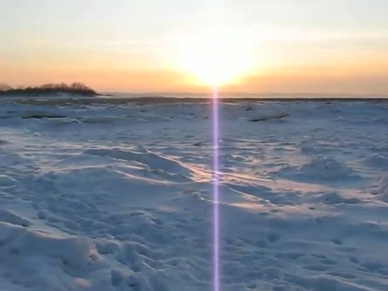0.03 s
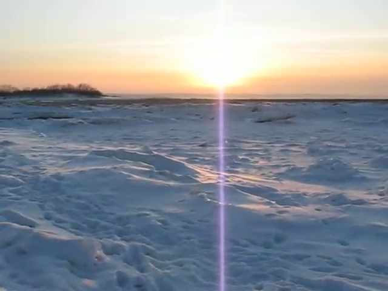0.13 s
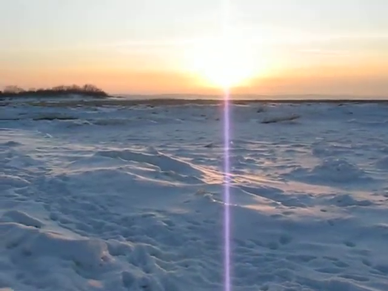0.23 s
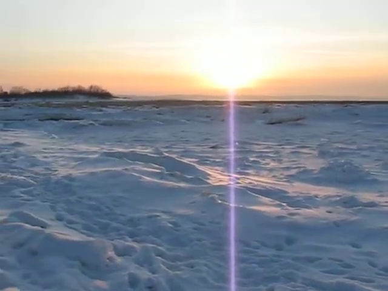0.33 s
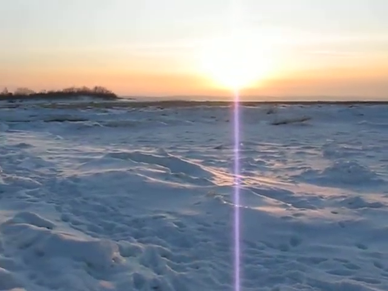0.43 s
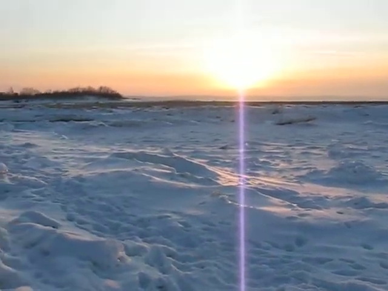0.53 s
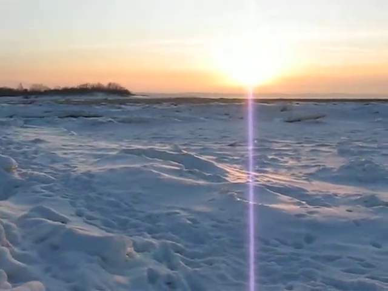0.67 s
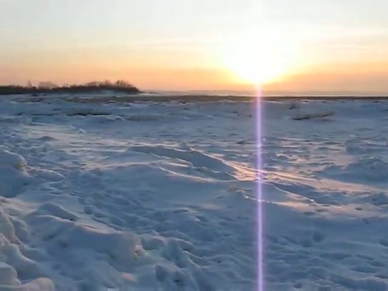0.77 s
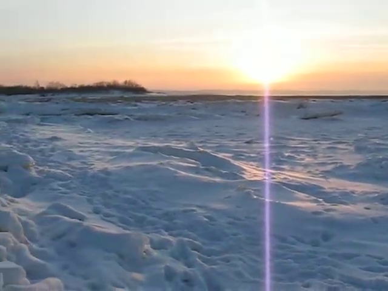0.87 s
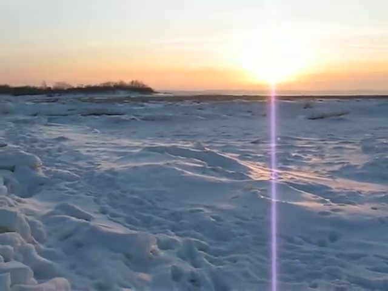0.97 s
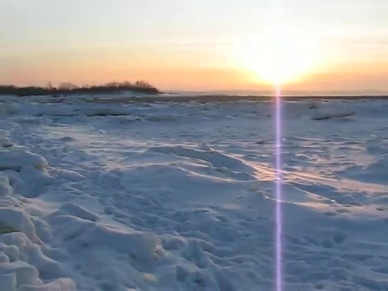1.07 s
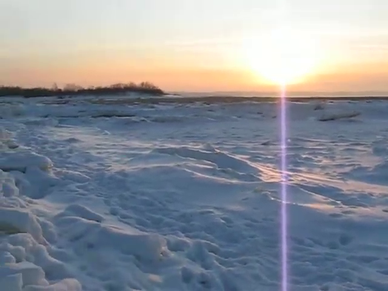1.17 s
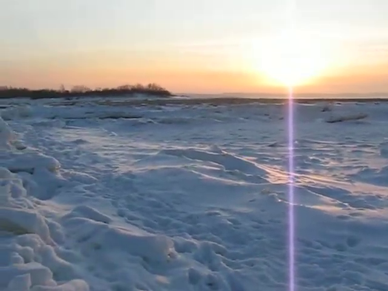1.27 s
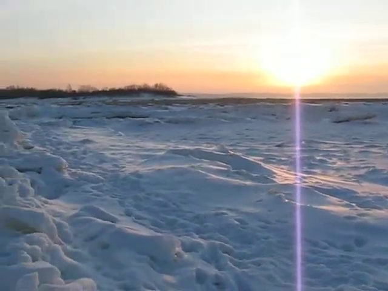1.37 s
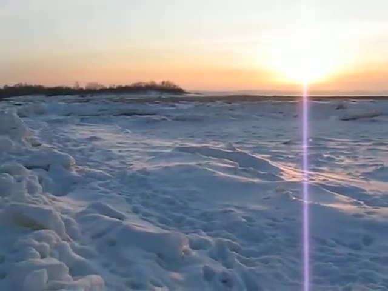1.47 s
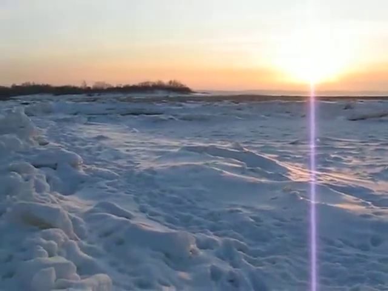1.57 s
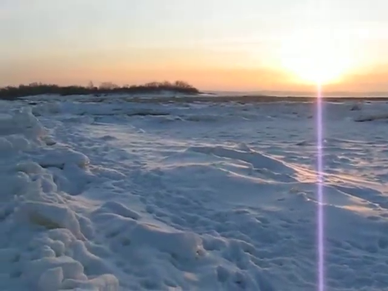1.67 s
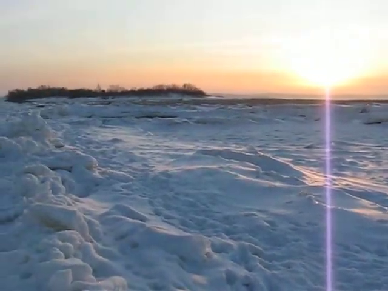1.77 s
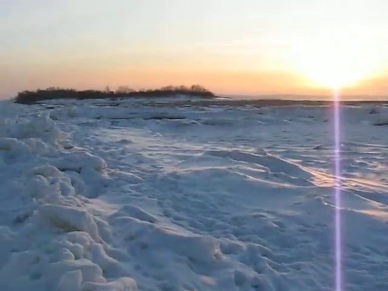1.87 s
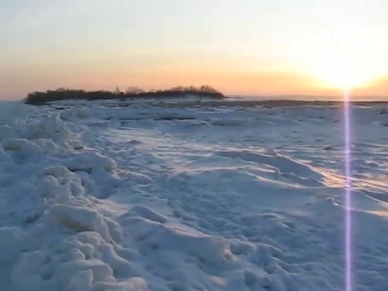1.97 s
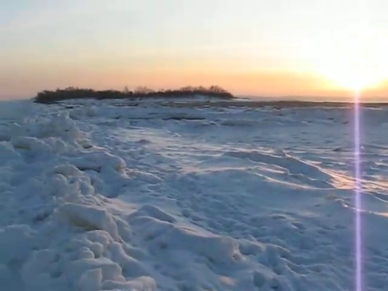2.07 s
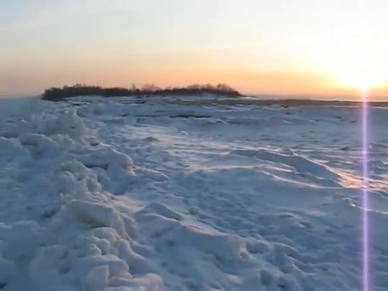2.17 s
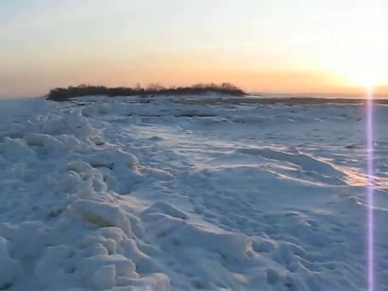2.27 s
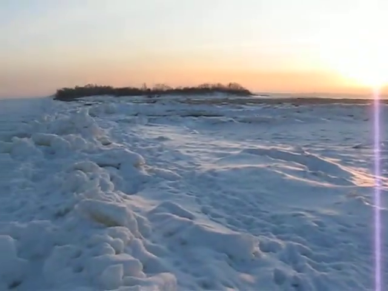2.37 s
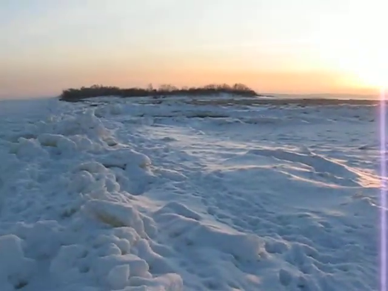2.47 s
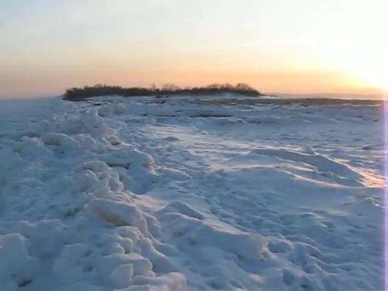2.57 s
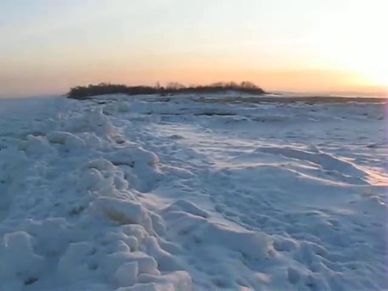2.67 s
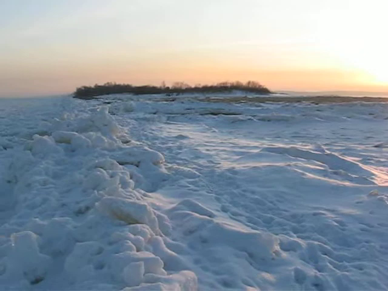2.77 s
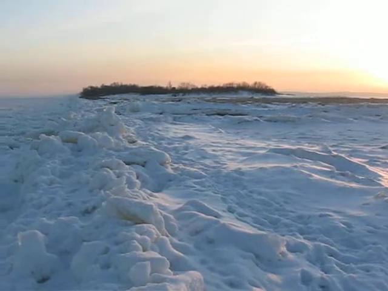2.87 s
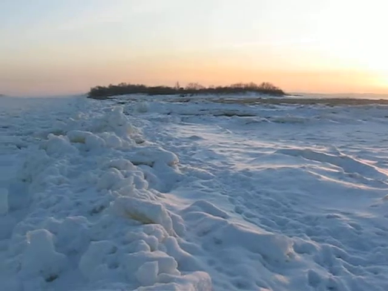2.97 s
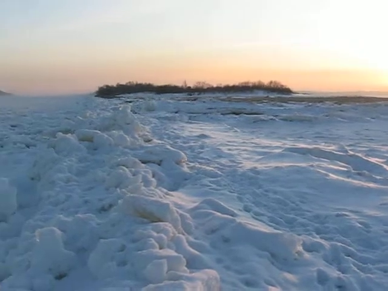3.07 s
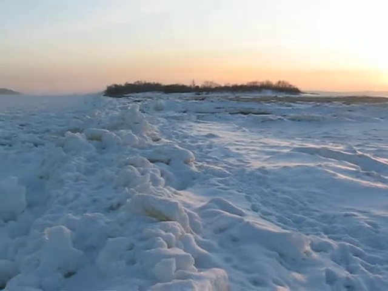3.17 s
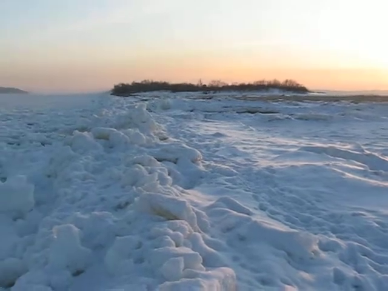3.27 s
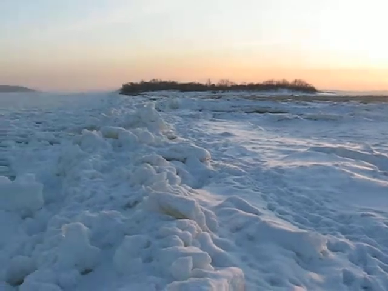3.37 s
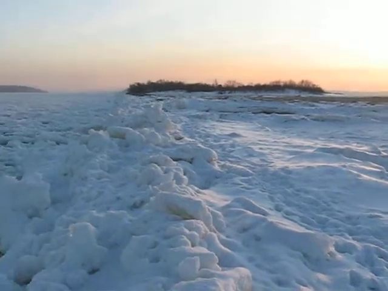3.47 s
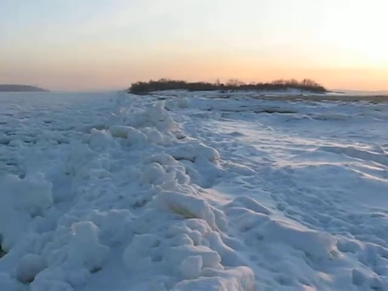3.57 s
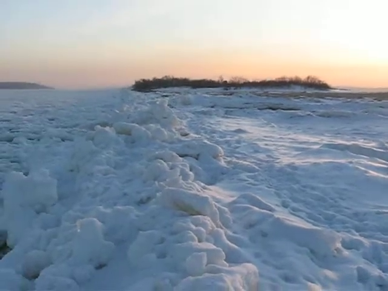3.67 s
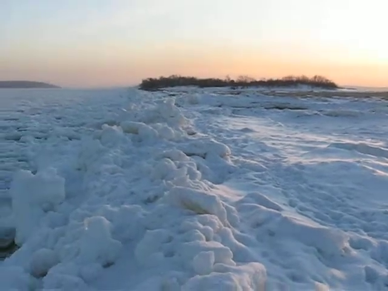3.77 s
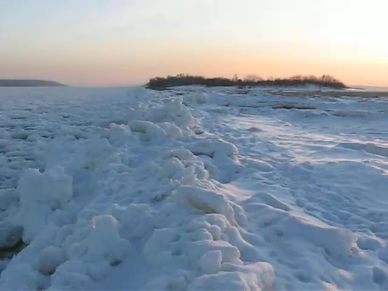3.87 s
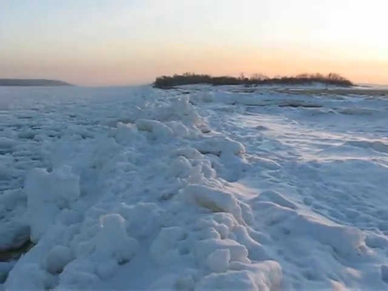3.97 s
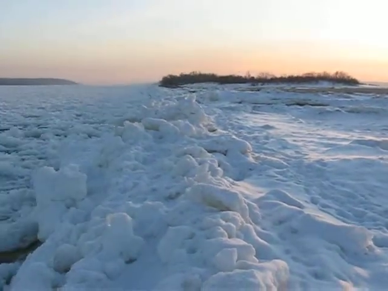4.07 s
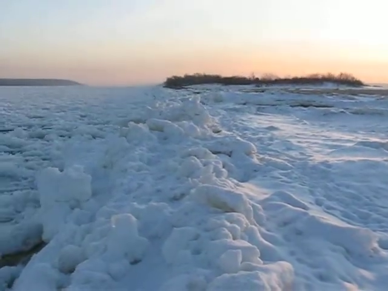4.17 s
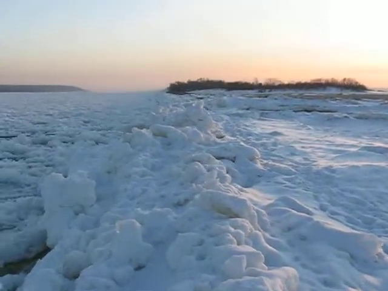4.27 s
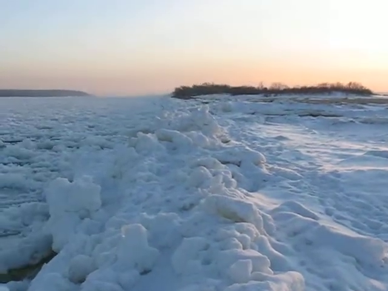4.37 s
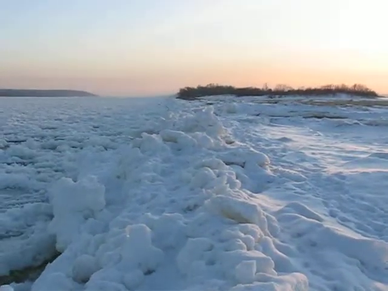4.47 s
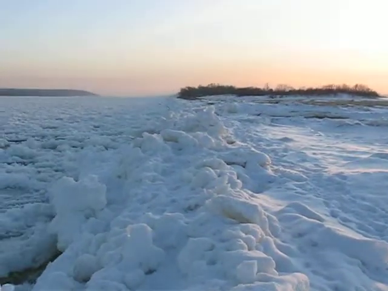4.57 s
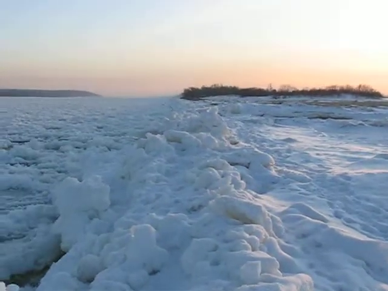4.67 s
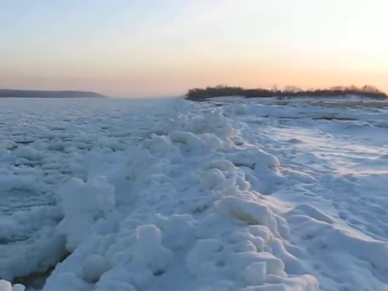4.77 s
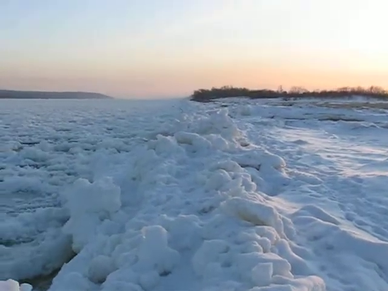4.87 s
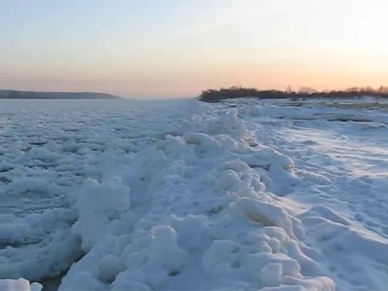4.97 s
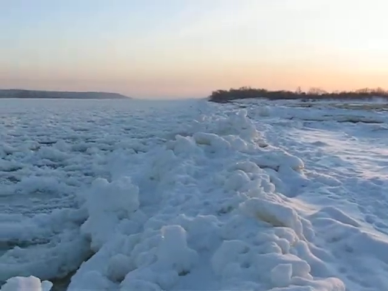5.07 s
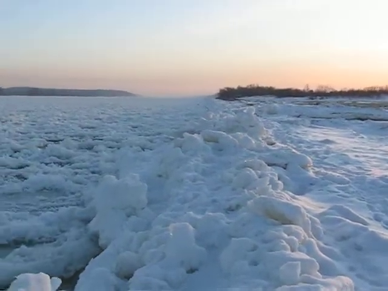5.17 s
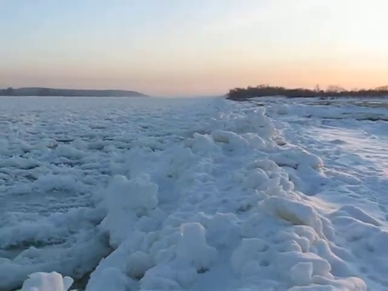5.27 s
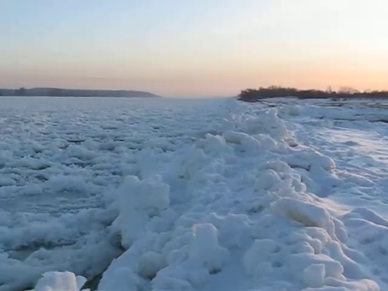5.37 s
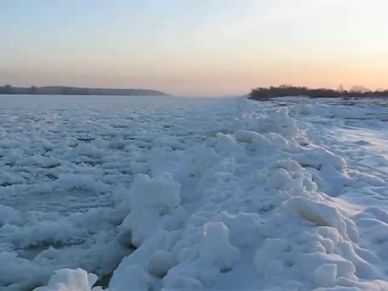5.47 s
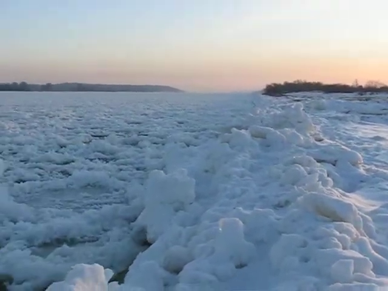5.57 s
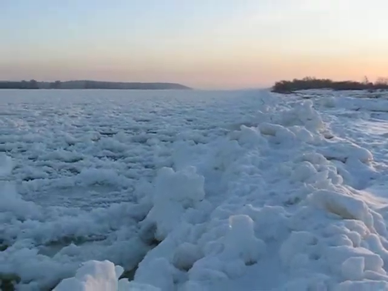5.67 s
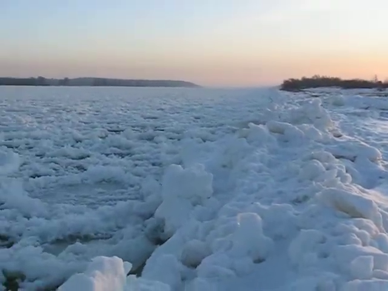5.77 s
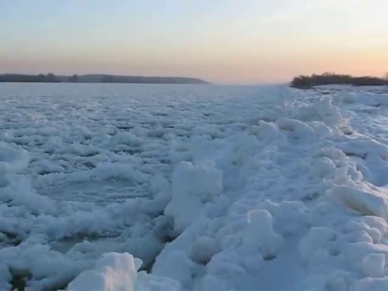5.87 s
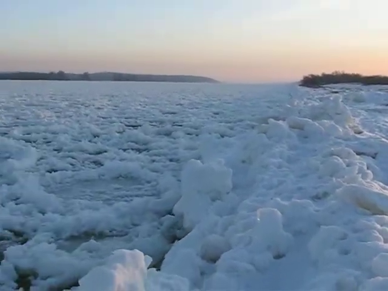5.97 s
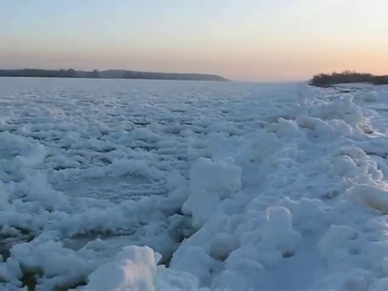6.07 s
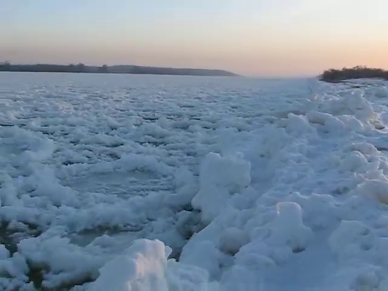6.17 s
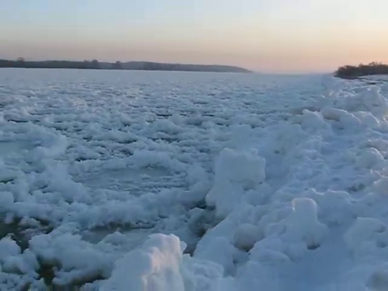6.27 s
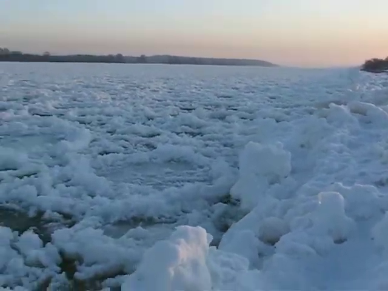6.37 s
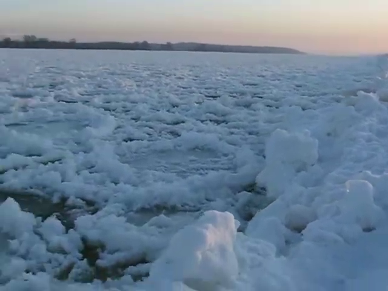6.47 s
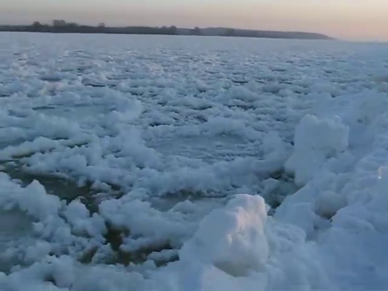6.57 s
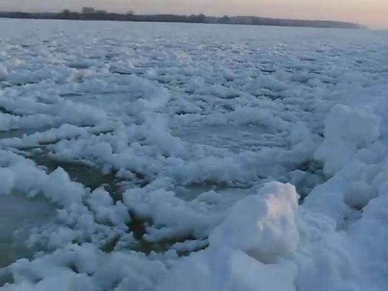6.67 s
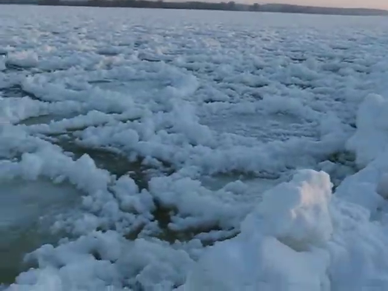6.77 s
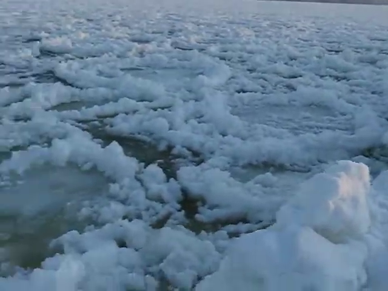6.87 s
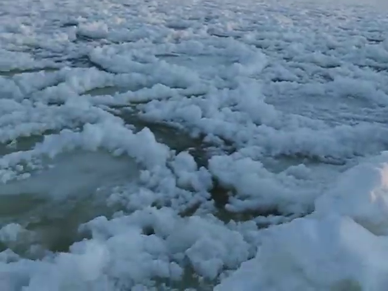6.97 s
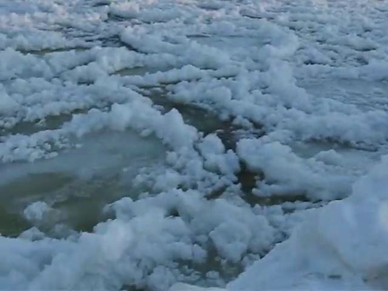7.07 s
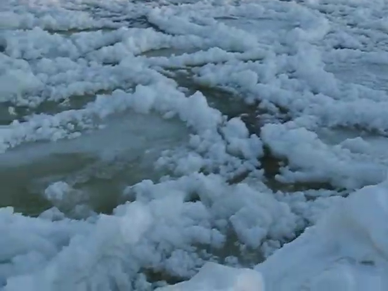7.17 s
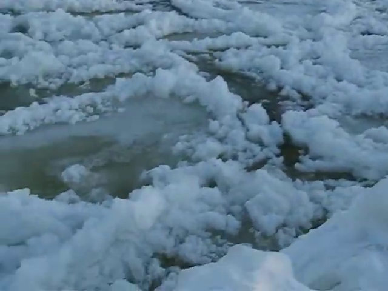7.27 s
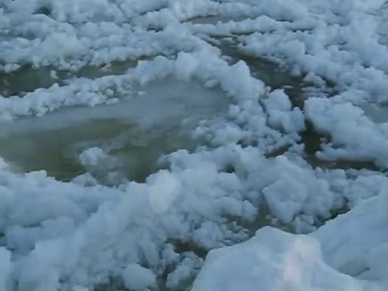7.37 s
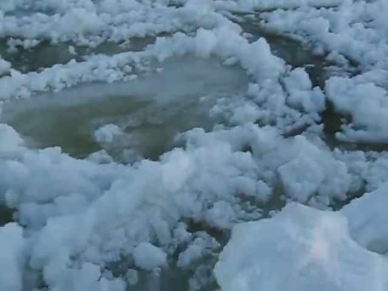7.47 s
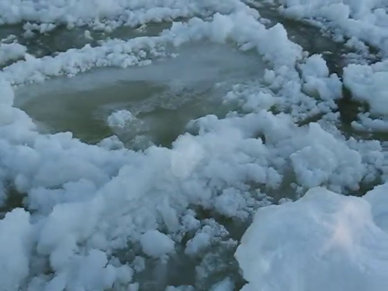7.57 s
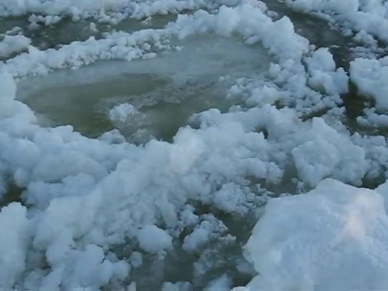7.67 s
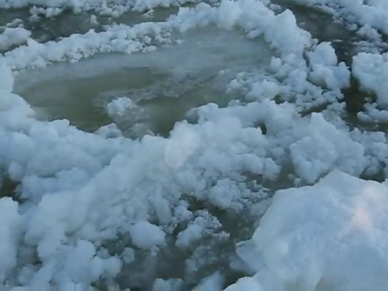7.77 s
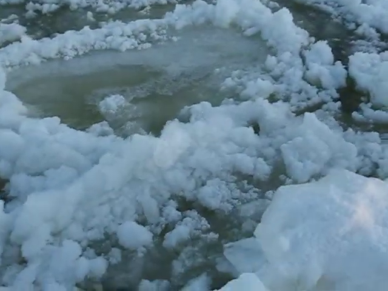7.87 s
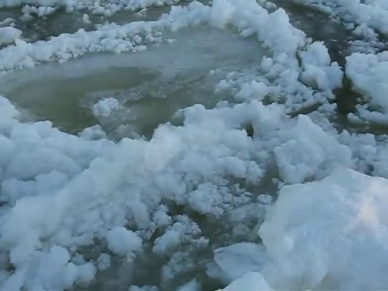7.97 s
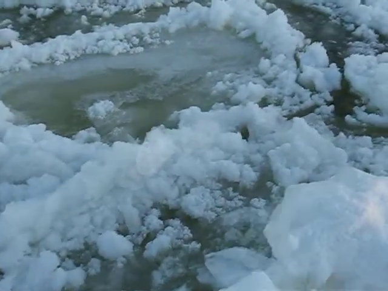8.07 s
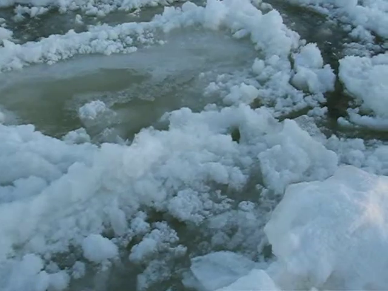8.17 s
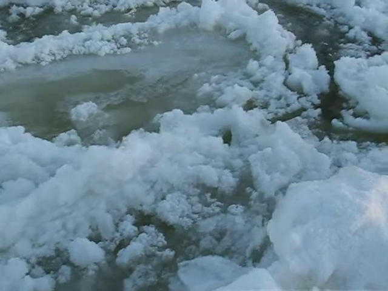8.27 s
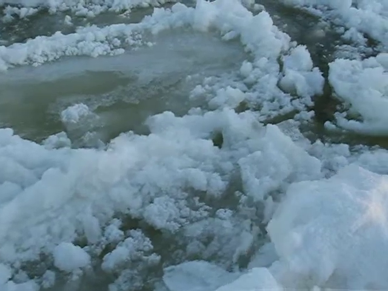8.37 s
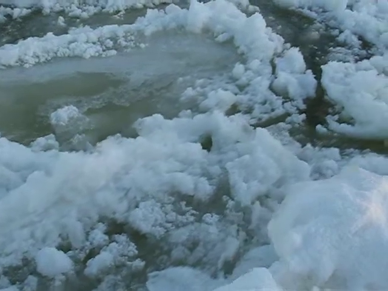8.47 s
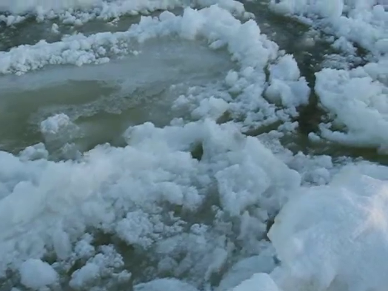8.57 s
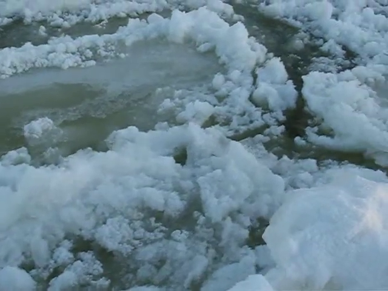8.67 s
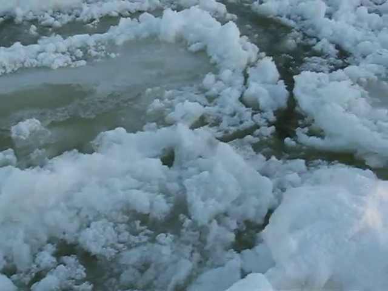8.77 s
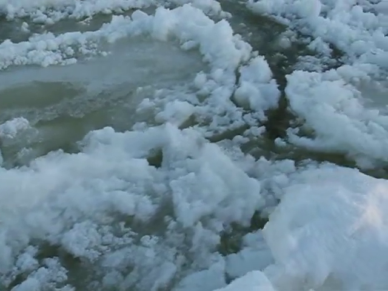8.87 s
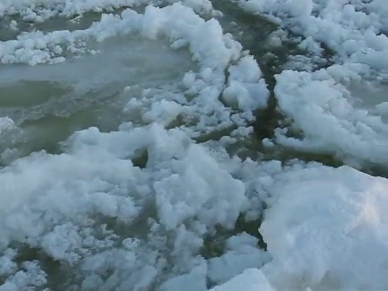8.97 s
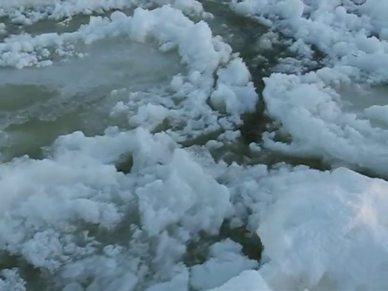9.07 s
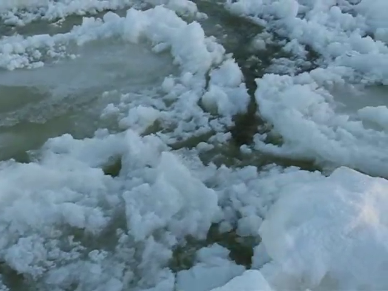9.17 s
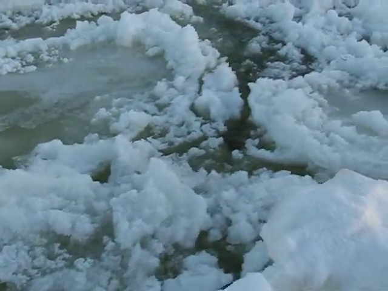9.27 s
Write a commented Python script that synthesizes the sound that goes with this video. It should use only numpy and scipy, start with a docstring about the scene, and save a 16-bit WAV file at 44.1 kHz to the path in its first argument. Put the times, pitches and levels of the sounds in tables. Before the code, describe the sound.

Open riverbank in winter, heard through a hand-held stereo microphone. From 0 s a low, soft roar of moving ice lies under a dense, grainy hiss from a far ice field on the left, swelling to about 2.6 s and then easing slowly. Wind thumps the microphone in dull low puffs, notably near 1.5, 2.1 and 3.6 s, often uneven between sides. A weak rub or crack passes occasionally. Around 4 s fine grinding of nearer floes fades in, slightly left. At 6 s it jumps forward, louder and brighter, and swings to the centre. From 6.5 to 8 s crushing surges flicker quickly, with sharp cracks and dry ticks, strongest around 6.55, 7.0 and 7.3-7.5 s. Gusts thud near 6.9 and 8.2 s. The crunch dips around 8.4 s, a cluster of brittle snaps follows at 8.5-8.6 s, then loose crunching and scattered cracks continue to the end at about 9.3 s.

```python
"""Nearby ice floes and slush crunch together along a snowy bank: flickering grains of noise, with cracks,
sharp ticks and soft rubs, from low to fairly high, on top. A far ice field hisses from the left, made of
denser grains. A low roar of moving ice lies under all, and gusts thump the two ports (microphone
openings) of a hand-held stereo recorder as low noise. The recorder turns from the shore to the river,
so the crunch of the near floes swings to the front."""
import sys
import numpy as np
from scipy import signal
from scipy.fft import next_fast_len
from scipy.io import wavfile
from scipy.ndimage import map_coordinates

SR = 44100
rng = np.random.default_rng(int(sys.argv[2]) if len(sys.argv) > 2 else 0)


def generate_wav(signal):
    """Clip the signal to [-1, 1] and save it as 16-bit WAV at the path in sys.argv[1]."""
    frames = np.transpose(np.atleast_2d(signal))
    scaled = np.clip(frames, -1, 1) * 32767
    pcm = np.round(scaled).astype(np.int16)
    wavfile.write(sys.argv[1], SR, pcm)


N = 411012   # length of the scene in samples

FAR_LEAD_MS = 0.22   # the left port hears sound from the left this much earlier
MIC_ROLL_OFF_HZ = 7450

# how much earlier the left port hears the near ice as the recorder turns (below 0: the right is first):
# (time [s], lead [ms])
NEAR_LEAD_OVER_TIME = [(4.0, 0.11), (6.0, 0.072), (7.1, 0.0065), (9.3, -0.0098)]


def from_db(db):
    """Turn decibels into a plain amplitude factor."""
    return np.exp(np.asarray(db) * (np.log(10) / 20))


def rms_one(x):
    """Scale a sound to an average strength (rms) of 1."""
    return x / np.sqrt(np.mean(np.abs(x) ** 2) + 1e-20)


def in_time(rows):
    """Draw straight lines between the timed rows of a table; one curve per column."""
    seconds, *columns = np.transpose(rows)
    return [np.interp(np.arange(N) / SR, seconds, column) for column in columns]


def at_hz(points, hz):
    """Read each column of a table at one pitch, along a logarithmic pitch scale."""
    table_hz, *columns = np.transpose(points)
    return [np.interp(np.log(hz), np.log(table_hz), column) for column in columns]


def drift(rate_hz):
    """Slow random wander of spread 1: noise smoothed twice, each value held for 16 samples."""
    keep = np.exp(-32 * np.pi * rate_hz / SR)
    noise = rng.standard_normal(N // 16 + 4001)
    slow = signal.lfilter([1], [1, -2 * keep, keep * keep], noise)[4000:]   # skip the filter's start
    return np.repeat(rms_one(slow), 16)[:N]


def band(x, low_hz, high_hz, order=2):
    """Let only the pitches between two limits through."""
    return signal.sosfilt(signal.butter(order, [low_hz, high_hz], "band", fs=SR, output="sos"), x)


def swells(steady, events, rise):
    """Short swells add their power to a steady level; gives the level in dB and the mixed second column."""
    level_db, steady_other = in_time(steady)
    t = np.arange(N) / SR
    power = from_db(2 * level_db)
    weighted = power * steady_other
    for s, peak_db, own_other, fall_ms in events:
        near = slice(max(round((s - .5) * SR), 0), round((s + .5) * SR))
        after = 1000 * (t[near] - s) / max(fall_ms, 5)   # time since the peak, in fall times
        swell = from_db(2 * (peak_db - 10 * np.maximum(after, -after / rise)))
        power[near] += swell
        weighted[near] += swell * own_other
    return 10 * np.log10(power), weighted / power   # the stronger part counts more


def grains(per_s, spread_db, smooth, count):
    """Tiny fractures: random clicks of uneven size, mixed with a share of smooth noise; rms 1."""
    noise = rng.standard_normal((count, N))
    born = rng.random((count, N)) * SR / per_s
    hit = born < 1
    size_db = spread_db * np.minimum(-np.log(born[hit] + 1e-9), 5)   # many small, few large
    clicks = np.zeros((count, N))
    clicks[hit] = from_db(size_db) * np.sign(noise[hit])
    share = np.clip(smooth, 0, 1)
    shifted_noise = np.roll(noise, N // 2, axis=1)   # moved away from the clicks that took its signs
    return np.sqrt(1 - share) * rms_one(clicks) + np.sqrt(share) * shifted_noise


def at_the_ports(source, spectrum, port_differences, lead_ms, body_db, grit_db, patchy_db, patch_rate):
    """In third-octave bands, shared sound reaches the ports with a lag and shading; the rest is scattered."""
    late = np.arange(N) - lead_ms * SR / 1000
    shared = source[:2]
    # shifted by a quarter cycle, to turn the phase
    turned = signal.hilbert(shared, next_fast_len(N))[:, :N].imag
    shared_late = [map_coordinates(v, [late], order=2) for v in shared]
    turned_late = [map_coordinates(v, [late], order=2) for v in turned]
    edges = spectrum[0][0] * 2 ** (np.arange(-1, 15) / 3)
    edges = edges[edges < 11500]
    out = np.zeros((2, N))
    for k, (low, high) in enumerate(zip(edges, edges[1:])):
        hz = np.sqrt(low * high)
        j = k % 2   # neighbouring bands get unrelated grains
        level_db, = at_hz(spectrum, hz)
        shade_db, alike, phase = at_hz(port_differences, hz)
        alike = np.clip(alike, 0, 1)
        right = np.cos(phase) * shared_late[j] - np.sin(phase) * turned_late[j]
        scattered = source[2:][::1 - 2 * j]   # every other band swaps the ports
        pair = np.sqrt(alike) * np.array([shared[j], right]) + np.sqrt(1 - alike) * scattered
        body_part_db = body_db / (1 + (hz / 2600) ** 4)
        grit_part_db = grit_db / (1 + (np.log(hz / 4600) / 0.34) ** 2)
        flicker_db = patchy_db * drift(patch_rate)
        gain = from_db(level_db + body_part_db + grit_part_db + flicker_db)
        out += gain * band(pair, low, high) * from_db([[shade_db / 2], [-shade_db / 2]])
    return out / np.sqrt(np.mean(band(out, 3500, 8000) ** 2))   # rms 1 from 3.5 to 8 kHz


def near_floes():
    """Snowy rims crush against each other: coarse grains whose level flickers, with stronger surges."""
    # tone colour of the crunch: (pitch [Hz], relative level per Hz [dB])
    crunch_colour = [(400, -15), (800, -8), (1500, 5), (2200, 2.5), (3200, -0.5), (4500, -4), (6500, -0.5),
                     (8000, 4.5), (10000, -3)]
    # port differences of the crunch by pitch:
    # (pitch [Hz], left minus right [dB], likeness of the ports [0-1], phase beyond the plain lag [rad])
    crunch_ports = [(700, -1, 0.95, -0.38), (1480, -0.5, 1, -0.075), (2300, -4.5, 0.85, 0.2),
                    (2900, -2.5, 0.95, -0.55), (4160, 3.5, 0.82, -0.6), (5500, 1, 0.96, 0.12),
                    (7060, 0, 0.75, -0.056), (8200, -3.5, 0.11, .3), (10000, -4.5, 0.066, .3)]
    # steady grinding: (time [s], level [dB], extra body below about 2.6 kHz [dB])
    grinding = [(3.2, -62, 3.5), (4.1, -33.5, 1.5), (5.5, -34.5, 1), (5.98, -33, 4), (6.03, -21.5, -5.5),
                (6.5, -25, 3), (6.75, -29, 2.5), (7.25, -23.5, -1), (7.4, -25.5, 1), (7.5, -25, -1.5),
                (7.67, -23, -2), (7.72, -28, -3.5), (8.05, -32.5, -4.5), (8.12, -30.5, -4), (8.45, -37, 8),
                (8.78, -32, -1.5), (9.05, -29.5, 5), (9.32, -28.5, -0.5)]
    # rims crush in a surge:
    # (time of peak [s], peak [dB], extra body below about 2.6 kHz [dB], time to fall 10 dB [ms])
    surge_list = [(5.68, -31, -2.5, 497), (6.03, -24, -1, 42), (6.571, -19.5, -3, 29),
                  (6.68, -18.5, -1.5, 21), (6.9, -26.5, -4, 304), (7.468, -29, -4, 57),
                  (7.565, -24.5, -5, 41), (7.9, -21.5, -3, 43), (7.979, -23, 6, 7), (8.069, -26, 0, 45.5),
                  (8.5, -28.5, -5, 402.5), (8.95, -25, -9.5, 132)]
    # emphasis of the crunch around 4.6 kHz: (time [s], level [dB])
    grit = [(5.5, -3.5), (6.0, 4.5), (6.25, 9), (6.8, 6), (7.6, 2.5), (8.2, -0.5)]
    crunch_db, body_db = swells(grinding, surge_list, rise=1.14)   # rise time over fall time
    clumps = from_db(1.1 * drift(25) + 0.7 * drift(100))
    fractures = grains(1800, 3.4, 0.61, count=4)
    lead_ms, = in_time(NEAR_LEAD_OVER_TIME)
    grit_db, = in_time(grit)
    crunch = at_the_ports(fractures, crunch_colour, crunch_ports, lead_ms, body_db, grit_db,
                          patchy_db=2.0, patch_rate=11.6)
    return from_db(crunch_db) * clumps * crunch


def cracks():
    """Ice crust cracks: short bursts of uneven grains, each around its own pitch, swell and die fast."""
    # single cracks: (time [s], peak [dB], pitch [Hz], left minus right [dB], width [octaves], length [ms])
    crack_list = [(0.654, -22, 4300, 13, 0.86, 25), (4.009, -19.5, 3000, 24, 1.8, 13),
                  (4.262, -19, 4700, 1, 0.4, 2.5), (6.553, -4, 5950, 4, 0.48, 1.5),
                  (6.562, -12, 6000, 3, .3, 7), (6.671, -6, 4180, 0, 1.3, 2.6),
                  (7.05, -10, 4400, 1, 0.42, 2.5), (7.267, -3, 6500, 1, 0.76, 3.6),
                  (7.463, -1.5, 5500, 4, 1.35, 8), (7.553, -13, 2000, 0, 0.85, 29),
                  (7.599, -8, 2000, -5, 0.93, 5.7), (7.876, -17, 2400, -1, 0.66, 33),
                  (7.891, -6, 4500, 2, 2.0, 13), (7.917, -14, 2460, -5, 0.24, 3.8),
                  (8.494, -12, 6500, 0, .8, 8), (8.517, -9, 6900, -5, 0.57, 3.1),
                  (8.565, -8, 6700, 1, 0.53, 5), (8.579, -7, 6400, -2, 0.69, 2.4),
                  (8.681, -18, 1550, -2, .5, 5), (8.866, -16, 1600, 2, .6, 2.3),
                  (8.898, -13, 5400, 3, 0.58, 1.9), (9.003, -10.5, 3850, -10, 0.27, 2.7),
                  (9.15, -11, 6200, 0, .8, 2.2)]
    ms = np.arange(SR // 10) * 1000 / SR
    noise = rng.standard_normal((len(crack_list), len(ms))) ** 3   # cubed: a few grains stand out
    out = np.zeros((2, N))
    for (s, peak_db, hz, pan_db, octaves, length_ms), burst in zip(crack_list, noise):
        spread = 2 ** (max(octaves, .2) / 2)
        age = ms / max(length_ms, .2)
        swell = age * np.exp(-2 * age)   # strongest at half the length
        snap = band(burst * swell, hz / spread, min(hz * spread, 12000))
        snap = from_db(peak_db) * snap / abs(snap).max()
        at = round(s * SR)
        # cracks come from the left until the river is in front
        lag = round(FAR_LEAD_MS * SR / 1000) * (s < 5.9)
        out[0, at:at + len(ms)] += from_db(pan_db / 2) * snap
        out[1, at + lag:at + lag + len(ms)] += from_db(-pan_db / 2) * snap
    return out


def ticks():
    """Thin ice snaps: one sharp edge with a very short rattle after it, the same at both ports."""
    # single snaps: (time [s], peak [dB])
    tick_list = [(3.870, -18), (4.121, -19), (4.264, -20), (5.952, -12), (6.421, -10), (6.575, -10),
                 (6.586, -8), (6.985, -4), (7.296, -7), (7.349, -8), (7.532, -6), (7.602, -8), (7.623, -6),
                 (7.810, -16), (7.921, -10), (7.979, -7), (8.479, -14), (8.582, -5), (8.599, -14)]
    decay_ms, low_hz = 0.47, 1300
    ms = np.arange(SR // 100) * 1000 / SR
    rattle = rng.standard_normal((len(tick_list), len(ms))) * np.exp(-ms / decay_ms)
    rattle[:, 0] = 2   # the sharp edge
    high_pass = signal.butter(2, low_hz, "high", fs=SR, output="sos")
    snaps = signal.sosfilt(high_pass, band(rattle, 300, MIC_ROLL_OFF_HZ))
    out = np.zeros((2, N))
    for (s, peak_db), snap in zip(tick_list, snaps):
        at = round(s * SR)
        out[:, at:at + len(ms)] += from_db(peak_db) * snap / abs(snap).max()
    return out


def rubs():
    """Ice rubs: a short swell of narrow noise, from low to fairly high, the same at both ports."""
    # rubs: (time of peak [s], length, as the spread of a bell curve [s], pitch [Hz], level [dB],
    # width [octaves])
    rub_list = [(0.049, 0.019, 272, -24.5, 0.71), (0.661, 0.13, 388, -29, 0.89),
                (2.367, 0.12, 1750, -33, 0.47), (4.833, 0.0036, 516, -21.5, 0.43),
                (6.18, 0.22, 697, -30, 0.61), (6.208, 0.066, 3780, -29, 0.24)]
    noise = rng.standard_normal((len(rub_list), SR))
    out = np.zeros(N)
    for (s, length, hz, level_db, octaves), rub in zip(rub_list, noise):
        at = np.arange(max(round(s * SR) - SR // 2, 0), round(s * SR) + SR // 2)
        spread = 2 ** (max(octaves, .2) / 2)
        swell = np.exp(-.5 * ((at / SR - s) / length) ** 2)
        sound = swell * band(rub, hz / spread, hz * spread)[-len(at):]
        same_energy = np.sqrt(np.sum(swell ** 2) / np.sum(sound ** 2))
        out[at] += from_db(level_db) * sound * same_energy
    return out


def far_ice():
    """Countless distant floes rub: dense grains that swell together in short, slight surges."""
    # tone colour of the hiss: (pitch [Hz], relative level per Hz [dB])
    hiss_colour = [(700, -0.5), (1200, 0), (2000, 0), (3000, -2), (4500, -3.5), (6500, 1), (8000, -1),
                   (10000, -3)]
    # port differences of the hiss by pitch:
    # (pitch [Hz], left minus right [dB], likeness of the ports [0-1], phase beyond the plain lag [rad])
    hiss_ports = [(696, -1, 0.96, 0.76), (1580, -0.5, 0.92, 0.84), (2260, 1.5, 0.36, 1.43),
                  (2940, 1.5, 0.82, 0.73), (3720, 9.5, 0.58, 0.33), (4630, 8.5, 0.84, -0.65),
                  (5570, 9, 1, -1.3), (7000, 8.5, 0.45, -0.78), (8200, -6, 0.61, -0.31),
                  (9450, 3.5, 0.98, 1.7)]
    # the far ice field: (time [s], level [dB], extra body below about 2.6 kHz [dB])
    far_level = [(0.0, -35.5, 3.5), (2.61, -23.5, -0.4), (5.3, -31.5, 2), (5.6, -27.5, -2),
                 (5.96, -25.5, -9), (6.1, -24.5, -2), (6.6, -31, -9.5), (8.3, -30.5, -3), (9.32, -30, -3)]
    hiss_db, body_db = in_time(far_level)
    surges = from_db(0.31 * drift(12.0) + 0.86 * drift(41))
    fractures = grains(5000, 3.6, 0.67, count=4)
    hiss = at_the_ports(fractures, hiss_colour, hiss_ports, FAR_LEAD_MS, body_db, 0,
                        patchy_db=0.82, patch_rate=14.0)
    return from_db(hiss_db) * surges * hiss


def roar():
    """Moving ice roars low: shaped noise, nearly alike at both ports but for the lag of the near ice."""
    # tone colour of the roar: (pitch [Hz], relative level per Hz [dB])
    roar_colour = [(60, -3.5), (150, 4), (300, 3), (500, -1), (800, 0.5), (1200, -10.5), (2000, -10.5),
                   (4000, -25)]
    # loudness of the roar: (time [s], level [dB])
    roar_level = [(0.0, -32), (0.57, -29.5), (5.96, -29.5), (6.03, -25.5), (6.59, -27.5), (9.32, -30.5)]
    white = rng.standard_normal((2, 2, N))
    edges = 50 * 2 ** np.arange(0, 7, .5)   # half-octave bands
    out = 0
    for k, (low, high) in enumerate(zip(edges, edges[1:])):
        gain = from_db(at_hz(roar_colour, np.sqrt(low * high))[0])
        out = out + gain * band(white[k % 2], low, high)
    roar_db, = in_time(roar_level)
    shared, scattered = from_db(roar_db) * out / np.sqrt(np.mean(band(out, 232, 1110) ** 2))
    lead_ms, = in_time(NEAR_LEAD_OVER_TIME)
    late = np.interp(np.arange(N) - lead_ms * SR / 1000, np.arange(N), shared)
    return np.array([shared + 0.045 * scattered, late - 0.046 * scattered])


def wind():
    """Lumpy eddies press on each port separately as low noise; stronger gusts reach higher in pitch."""
    # breeze on the ports: (time [s], level [dB], left minus right [dB])
    breeze = [(0.0, -35, -13), (.7, -34, 6), (1.04, -39, -6), (1.85, -32.5, -4), (2.82, -40, -21),
              (3.4, -27, -22), (3.84, -29, -24.5), (4.02, -33.5, -15), (4.4, -36, -14.5),
              (5.5, -34.5, -12.5), (6.15, -36.5, -13), (6.55, -29, -17), (6.72, -30.5, 5), (7.2, -22, 6.5),
              (7.8, -23.5, 10), (8.27, -18.5, 5), (8.45, -30.5, 10), (9.16, -23, -1.5), (9.23, -37, -14)]
    # gusts that thump the ports:
    # (time of peak [s], peak [dB], left minus right [dB], time to fall 10 dB [ms])
    gust_list = [(0.048, -25.5, 6, 74), (.59, -30, 22, 50), (1.145, -24.5, 23, 51), (1.3, -22, 0, 50),
                 (1.471, -16.5, -2, 32), (2.108, -20.5, -13.5, 75), (2.52, -24, -16, 147),
                 (3.63, -25, -13, 34), (4.244, -24, -22, 41), (5.0, -26, -8, 27), (5.66, -20, -10, 71),
                 (6.5, -25, -15.5, 404), (6.87, -18, 4, 139), (8.19, -17, 1, 45), (8.54, -19, 2.5, 200),
                 (8.77, -24.5, 20, 114), (8.885, -21, 4, 60)]
    # the wind's upper part over its thud: (time [s], level [dB])
    eddy_size = [(0.0, 4), (.8, -15), (1.5, 1.5), (2.2, -0.5), (2.7, -22), (3.5, -2), (5.0, -2.5),
                 (6.5, -4.5), (9.3, 1)]
    # deep rumble of the air at each port: (time [s], level [dB])
    rumble_level = [(0.0, -39), (2.2, -36), (4.0, -35), (6.0, -32), (6.45, -34), (7.6, -38), (9.3, -31.5)]
    rumble_follows = .4   # share of the wind's swing in dB that the rumble takes over
    level_db, pan_db = swells(breeze, gust_list, rise=0.99)   # rise time over fall time
    port_db = level_db + np.array([pan_db, -pan_db]) / 2
    lumps = from_db([3.4 * drift(24) for port in range(2)])
    eddies = rng.standard_normal((2, 2, N))
    thud = rms_one(band(eddies[0], 45.6, 107.4))
    flutter = rms_one(band(eddies[1], 124.0, 172.0, order=1))
    rasp = rms_one(band(eddies[0], 210, 282))
    gust_db = port_db + 16.5   # over a strong gust
    small_db, = in_time(eddy_size)
    flutter_gain = from_db(small_db + 0.54 * gust_db)
    rasp_gain = from_db(small_db - 23.5 + 1.9 * gust_db)
    buffeting = from_db(port_db) * rms_one(lumps) * (thud + flutter_gain * flutter + rasp_gain * rasp)
    wander_db = np.array([2.5 * drift(3) for port in range(2)])
    swing_db = rumble_follows * (port_db - port_db.mean())
    rumble_db = in_time(rumble_level)[0] + swing_db + wander_db
    rumble = from_db(rumble_db) * rms_one(band(eddies[1], 25, 55))
    return rumble + buffeting


def scene():
    """Add up all the sounds of the ice and the wind."""
    return near_floes() + cracks() + ticks() + rubs() + far_ice() + roar() + wind()


def record(dry):
    """The microphone falls off in the treble, peaks are rounded, the top is cut."""
    dull = signal.sosfilt(signal.butter(7, MIC_ROLL_OFF_HZ, fs=SR, output="sos"), dry)
    rounded = 0.93 * np.tanh(dull)
    top_cut = signal.cheby2(12, 60, 11400, fs=SR, output="sos")   # 60 dB down from 11.4 kHz up
    return signal.sosfilt(top_cut, rounded)


dry = scene()
out = record(dry)
generate_wav(out)
```